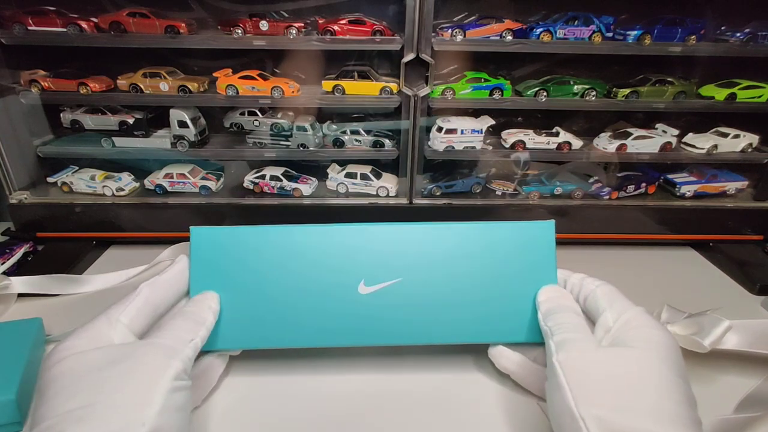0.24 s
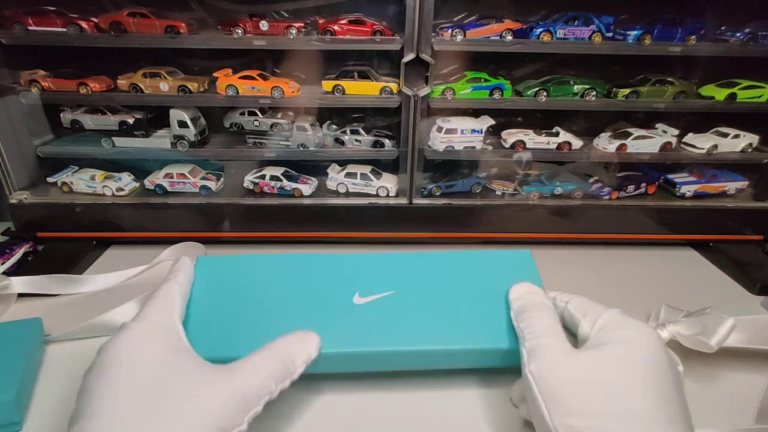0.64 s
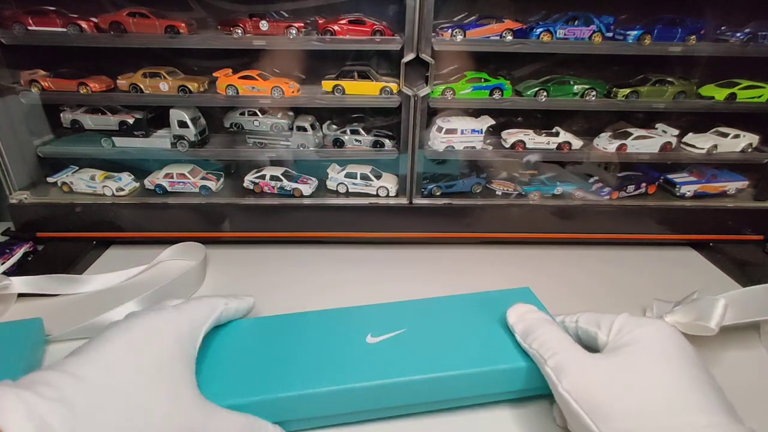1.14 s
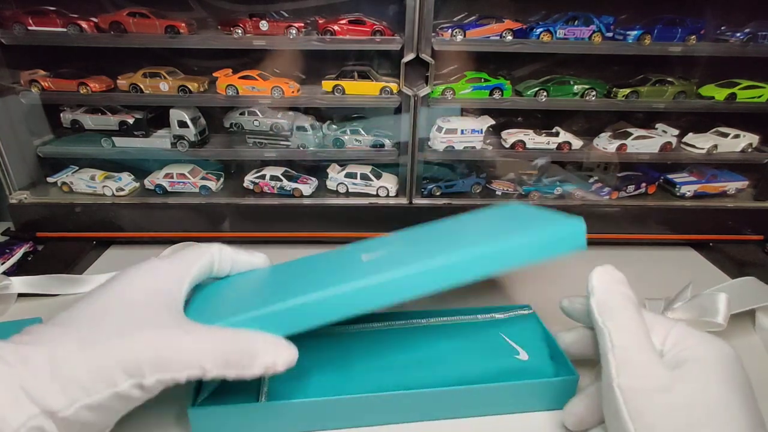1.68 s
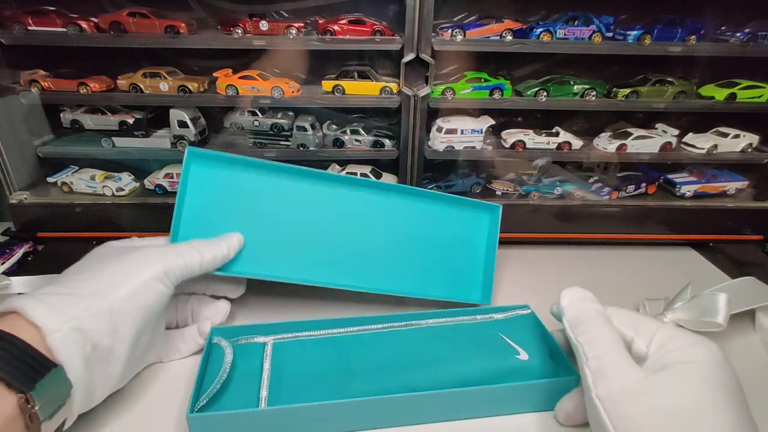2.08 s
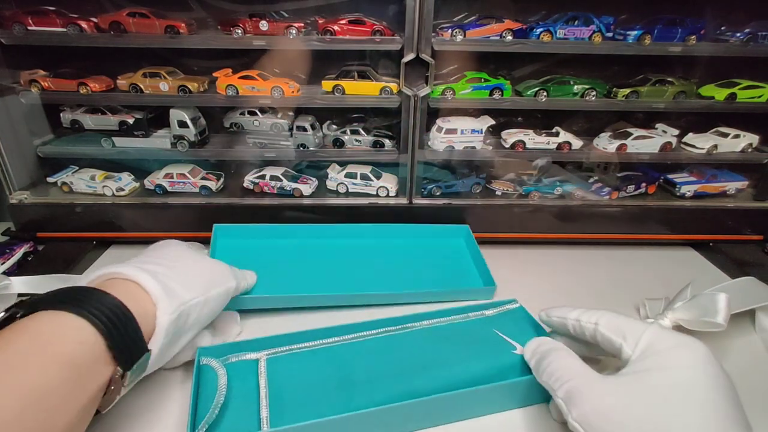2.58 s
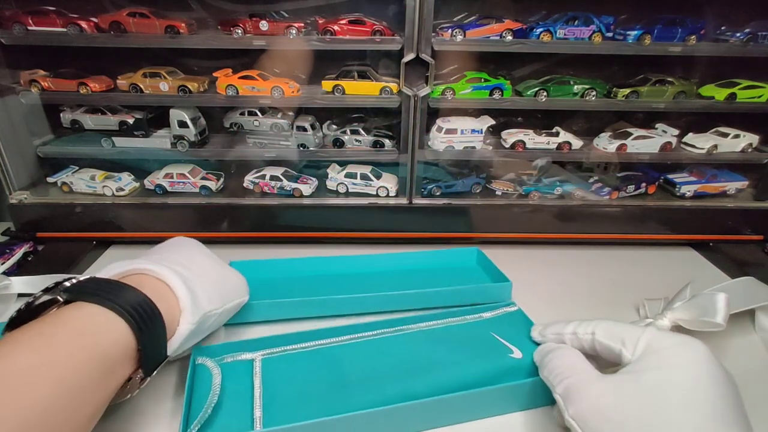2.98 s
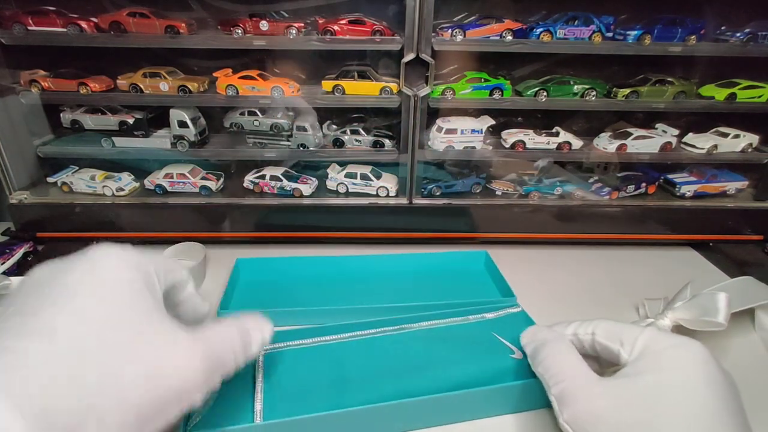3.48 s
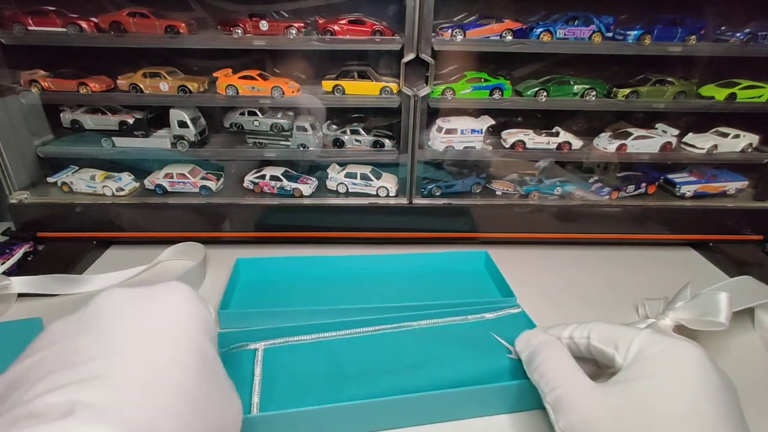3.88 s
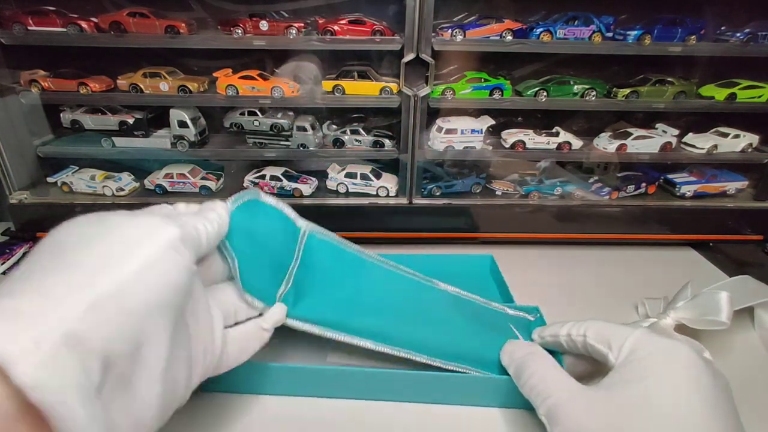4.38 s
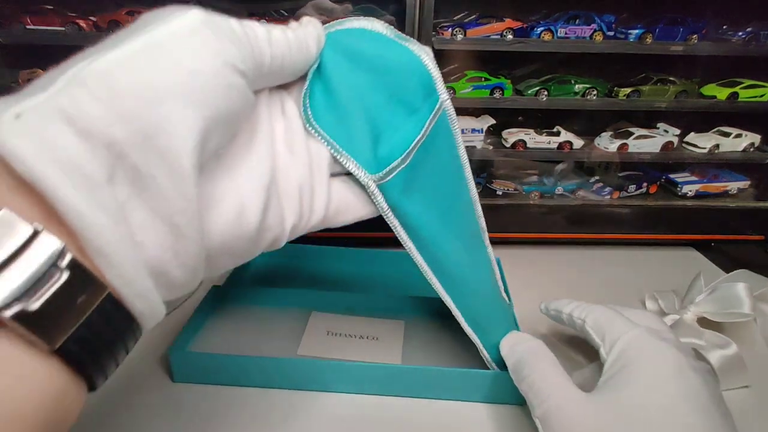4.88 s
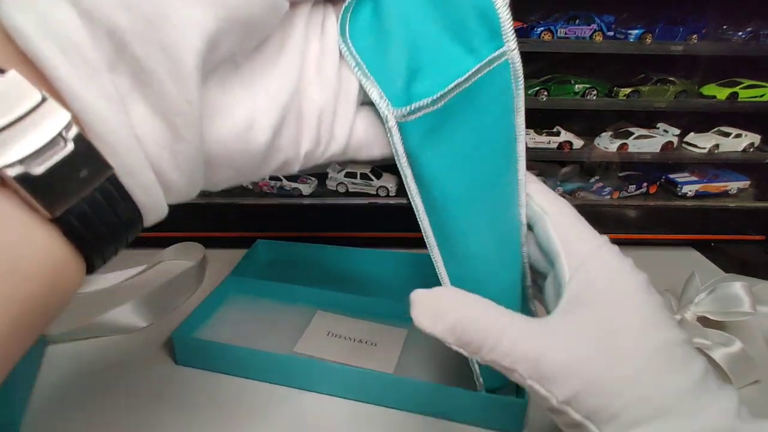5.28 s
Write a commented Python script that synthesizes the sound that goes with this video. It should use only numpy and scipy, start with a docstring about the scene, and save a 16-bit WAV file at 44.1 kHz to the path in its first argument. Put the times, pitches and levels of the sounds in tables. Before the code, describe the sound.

Gloved hands work the lid off a cardboard box with soft scrapes, hollow knocks and a loud double clack, then cloth rustles quietly.

```python
"""A quiet small room rumbles while gloves brush card: hands slide the lid off a cardboard box on a table,
turn it over, set it down and lift out a cloth bag, before two close microphone ports.
Blows ring the box's panels as decaying sines, thump the table and crack as short noise, with a short room tail.
Rubbing is random fibre clicks through resonances; treble ticks, dead pops and humming panels fall in between."""
import sys
import numpy as np
from scipy import signal
from scipy.fft import rfft, irfft
from scipy.io import wavfile
from scipy.ndimage import uniform_filter1d

SR = 44100
rng = np.random.default_rng(int(sys.argv[2]) if len(sys.argv) > 2 else 0)


def unload_audio(sound):
    """Save the sound as a 16-bit wav file, at the path given as the first command line argument."""
    columns = np.transpose(np.atleast_2d(sound))
    # keep every value between -1 and 1, then stretch to whole-number steps
    steps = np.round(np.clip(columns, -1, 1) * 32767)
    wavfile.write(sys.argv[1], SR, steps.astype(np.int16))


def boost_factor(decibels):
    """Convert a level in decibels to a linear amplitude factor."""
    exponent = np.asarray(decibels, float) / 20
    return 10 ** exponent


N = 243917  # samples


def evened(x):
    """Scales to rms 1."""
    return x / np.sqrt(np.mean(x ** 2) + 1e-20)


def early(x):
    """Scales to rms 1 over the first 15 ms."""
    return x / np.sqrt(np.mean(x[..., :660] ** 2))


def read(points, hz):
    """Reads a table along log frequency."""
    f, value = np.transpose(points)
    return np.interp(np.log(hz + 1), np.log(f + 1), value)


def add(mix, s, sound):
    """Mixes a sound in at time s."""
    part = mix[round(s * SR):][:len(sound)]
    part += sound[:len(part)]


def colour(x, points):
    """Filters by a spectrum in dB."""
    hz = np.fft.rfftfreq(x.shape[-1], 1 / SR)
    return irfft(rfft(x) * boost_factor(read(points, hz)), x.shape[-1])


def resonances(x, peaks):
    """Sum of two-pole resonances (Hz, width Hz, dB), neighbours in opposite sign, scaled to rms 1."""
    hz = np.fft.rfftfreq(N, 1 / SR)
    gain = 0
    for k, (f, width, db) in enumerate(peaks):
        band = 1j * hz * width
        gain = gain + (-1) ** k * boost_factor(db) * band / (f ** 2 - hz ** 2 + band)
    return evened(irfft(rfft(x) * gain, N))


def pair(sources, same, lean, lead):
    """Two microphone ports: the right hears a share of a second, unrelated source, later and at its own level."""
    hz = np.fft.rfftfreq(N, 1 / SR)
    likeness = np.clip(read(same, hz), 0, 1)
    tilt = boost_factor(read(lean, hz) / 2)
    first, second = rfft(sources)
    right = likeness * first + np.sqrt(1 - likeness ** 2) * second
    right = right * np.exp(-2j * np.pi * hz * lead / SR)
    return irfft(np.array([first * tilt, right / tilt]), N)


# Where the sounds on the box lie between the ports. Each row: time in seconds, left over right in dB.
BOX_PLACE = [(0, 5), (1.6, 4.5), (2.07, 4), (2.1, -2), (2.2, 2.4), (2.5, 4), (3.5, 6), (5.5, 5)]


def place(mix, s, sound, lead=3.5):
    """Adds a sound to both ports, louder at the nearer one, sooner at the left by lead samples."""
    lean_db = np.interp(s, *np.transpose(BOX_PLACE))
    for side, port in zip((1, -1), mix):
        add(port, s - side * lead / 2 / SR, sound * boost_factor(side * lean_db / 2))


# Spectrum of room rumble and microphone hiss. Each row: frequency in Hz, relative level in dB per Hz.
AIR_SPECTRUM = [(8.8, -31.5), (15, 0.5), (87, -5), (161, -12), (229, -15), (423, -18.5), (620, -18),
                (855, -27), (1020, -18), (1290, -24), (2680, -31), (3290, -29), (6850, -39.5),
                (14700, -30.5), (16500, -51)]
# How alike the ports hear the air. Each row: frequency in Hz, left-right likeness (1 is identical).
AIR_LIKENESS = [(60, 0.7), (180, 1), (550, -1.2), (1650, 1), (4970, 0.71), (15000, 0.082)]
# Balance of the air between the ports. Each row: frequency in Hz, left over right in dB.
AIR_BALANCE = [(60, 1), (180, 2.5), (550, 6.5), (1650, 7.5), (4970, 7.5), (15000, 3.5)]


def air():
    """Room rumble and microphone hiss: steady coloured noise, partly shared by the ports."""
    noise = evened(colour(rng.standard_normal((2, N)), AIR_SPECTRUM))
    return boost_factor(-60) * pair(noise, AIR_LIKENESS, AIR_BALANCE, 0)


# How long the small room rings. Each row: frequency in Hz, t60 in seconds.
ROOM_T60 = [(150, .25), (500, 0.42), (1500, .2), (4000, 0.52), (10000, 0.25)]


def room(x):
    """Room tail: sparse taps of random sign, each band dying at its own speed."""
    taps = np.zeros((2, SR // 2))
    slots = np.arange(200, SR // 2 - 20, 20)
    at = slots + rng.integers(0, 20, (2, len(slots)))
    np.put_along_axis(taps, at, rng.choice([-1., 1.], at.shape), 1)
    hz, t, z = signal.stft(taps, SR, nperseg=256)
    fade = boost_factor(-60 * t / read(ROOM_T60, hz)[:, None])
    tail = signal.istft(z * fade, SR, nperseg=256)[1]
    tail = tail / np.linalg.norm(tail[0])
    return signal.fftconvolve(x.mean(0)[None], tail, axes=1)[:, :N]


def fibres(per_s, uneven_db, smooth):
    """Fibres catch and let go: random clicks of uneven size over smooth noise."""
    hit, size, sign = rng.random((3, 2, N))
    sizes = boost_factor(-uneven_db * np.log(size + 0.0012))
    clicks = (hit < per_s / SR) * sizes * np.sign(sign - .5)
    return evened(clicks) + smooth * rng.standard_normal((2, N))


def streaky(x, patchy_db, frames, bins):
    """Patches of the spectrum swell and fade as the grip shifts."""
    z = signal.stft(x, nperseg=512, noverlap=384)[2]
    field = rng.standard_normal(z.shape[1:])
    field = evened(uniform_filter1d(uniform_filter1d(field, bins, 0), frames, 1))
    return signal.istft(z * boost_factor(patchy_db * field), nperseg=512, noverlap=384)[1][:, :N]


# Strokes of glove or cloth. Each row: peak in seconds, rise in seconds, fall in seconds, hiss in dB,
# fizz over hiss in dB.
RUB_STROKES = [(.088, .09, .1, -65, -8), (.39, 0.22, 0.062, -69, -8), (0.549, 0.01, 0.066, -64, -6),
               (.7, 0.1, 0.11, -53.5, -5), (.842, .1, 0.089, -57, 1.5), (1.0, 0.45, 0.6, -57.5, -8),
               (1.15, 0.014, 0.093, -52.5, -14), (1.3, 0.1, 0.54, -58, -7.5),
               (1.41, 0.032, .04, -56.5, -6.5), (1.468, 0.014, 0.017, -50.5, -19),
               (1.492, 0.005, 0.0085, -40, -18), (1.531, 0.053, 0.11, -44.5, -9.5),
               (1.75, 0.14, 0.28, -64.5, -7.5), (1.945, 0.087, 0.042, -50, -5),
               (2.06, 0.07, 0.027, -44, -8), (2.17, 0.013, 0.097, -47.5, -13.5),
               (2.351, 0.063, 0.06, -53.5, -8.5), (2.55, 0.23, 0.076, -61, -9.5),
               (2.631, 0.043, 0.3, -58.5, -4.5), (2.782, 0.082, 0.045, -45.5, -9.5),
               (2.88, 0.058, 0.066, -52, -10), (3.058, .03, 0.087, -68, -13.5),
               (3.24, .06, .06, -59.5, -14.5), (3.32, 0.021, .03, -70, -5), (3.717, .045, 0.047, -54, -13),
               (3.788, .03, 0.035, -53, -13), (3.909, 0.066, 0.075, -52.5, -11.5),
               (4.046, .05, .02, -60, -6.5), (4.178, 0.057, 0.11, -60.5, -9.5),
               (4.308, .015, .015, -61.5, -8.5), (4.38, 0.091, .03, -69.5, -6),
               (4.462, 0.062, 0.11, -53, -12), (4.737, 0.13, .2, -54, -14.5),
               (4.909, .08, 0.17, -60, -10.5), (5.18, 0.065, 0.24, -60.5, -10.5),
               (5.39, 0.052, 0.12, -56.5, -13)]
# How far the box drones along with a stroke. Each row: time in seconds, drone over hiss in dB.
BOX_CONTACT = [(0, 1.5), (.45, 0), (.62, -1), (1.0, -1), (1.4, 4.5), (1.62, -4), (1.8, -8.5), (1.95, -12.5),
               (2.1, -7), (2.58, 9.5), (2.7, 1.5), (2.9, -4), (3.06, -3.5), (3.25, 4), (3.7, -9),
               (4.3, -0.5), (4.75, -8.5), (5.15, -4.5), (5.3, -1.5), (5.53, -5.5)]


def rub_levels():
    """Gains of hiss, drone and fizz: strokes swell, fade and add in power; blows leave the panels droning."""
    edge_db, roundness = -11, 1.5  # level one rise or fall away from the peak; shape of the peak
    linger_db, linger_db_per_s, linger_rise_s = -18.5, 154.5, 0.005  # start against low panels, decay, onset
    t = np.arange(0, N + 64, 64) / SR
    s, rise, fall, hiss_db, fizz_db = np.transpose(RUB_STROKES)[:, :, None]
    away = np.where(t < s, (s - t) / rise, (t - s) / fall)
    swell = boost_factor(hiss_db + edge_db * away ** roundness) ** 2

    hit, low_db = np.transpose(BLOWS)[[0, 2], :, None]
    after = np.maximum(t - hit, 0)
    linger = boost_factor(low_db + linger_db - linger_db_per_s * after) * (1 - np.exp(-after / linger_rise_s))

    hiss = swell.sum(0)
    drone = hiss * boost_factor(np.interp(t, *np.transpose(BOX_CONTACT))) ** 2 + (linger ** 2).sum(0)
    fizz = (swell * boost_factor(fizz_db) ** 2).sum(0)
    return [np.interp(np.arange(N) / SR, t, np.sqrt(power)) for power in (hiss, drone, fizz)]


# Resonances of rubbed card and of the microphone ports. Each row: frequency in Hz, width in Hz, level in dB.
HISS_PEAKS = [(2000, 150, -1), (2500, 580, -5), (2850, 230, -1.5), (3190, 260, -1.5), (3700, 430, 2.5),
              (4300, 770, 2), (4810, 780, -1.5)]
# How strongly rubbing drives the panels and table. Each row: frequency in Hz, drive in dB.
DRONE_DRIVE = [(130, -6.5), (190, -5.5), (300, 0.5), (420, -1), (640, -2), (860, -3), (1100, 1),
               (1500, -3.5), (2100, -11)]
# Spectrum of the bright fizz. Each row: frequency in Hz, relative level in dB per Hz.
FIZZ_SPECTRUM = [(2940, -27), (5000, -18.5), (5690, -4.5), (8000, -4.5), (11700, -12.5), (15200, -4.5),
                 (16300, -20), (16500, -49)]
# How alike the ports hear the hands. Each row: frequency in Hz, left-right likeness.
HAND_LIKENESS = [(60, 1), (180, 1), (550, 0.93), (1650, 0.63), (4970, 0.34), (15000, -0.03)]
# Balance of the hands between the ports. Each row: frequency in Hz, left over right in dB.
HAND_BALANCE = [(60, 3.5), (130, 5), (290, 1), (640, 4), (1410, 4.5), (3100, 16), (6820, -1.5), (15000, -1)]


def rubbing():
    """Gloves and cloth slide on card: hiss, the panels droning along, and bright fizz."""
    ring_factor = 1.3  # panels ring longer under a light, sliding hand
    hand_lead = 6.4  # samples by which the left port hears the hands first
    grip = evened(uniform_filter1d(uniform_filter1d(rng.standard_normal(N), 300), 300))  # pressure wavers
    modes = [(hz, 2.2 / (t60 * ring_factor), db + read(DRONE_DRIVE, hz))
             for hz, db, t60, *swing in TABLE_MODES + BOX_PANELS]
    hiss = streaky(resonances(fibres(2000, 3.2, 1.6), HISS_PEAKS), 2.8, frames=12, bins=3)
    drone = streaky(resonances(fibres(970, 1.3, 0.4), modes), 1.3, frames=24, bins=2)
    fizz = colour(fibres(4100, 2.0, 2.0), FIZZ_SPECTRUM)
    out = np.zeros((2, N))
    for layer, level in zip((hiss, drone, fizz), rub_levels()):
        ports = pair(layer, HAND_LIKENESS, HAND_BALANCE, hand_lead)
        out += ports / np.std(ports.mean(0)) * level * boost_factor(.9 * grip)
    return out


# Slips of a finger. Each row: start in seconds, length in seconds, frequency in Hz, width in Hz,
# level in dB before the fades.
FINGER_SQUEAKS = [(1.46, 0.022, 1550, 120, -53.5), (1.599, 0.029, 2620, 100, -58),
                  (1.87, 0.21, 2000, 119, -73.5), (2.765, 0.079, 3700, 149, -50.5),
                  (3.036, 0.0794, 3700, 251, -64), (5.363, 0.14, 810, 73.5, -70.5)]


def squeaks():
    """A slipping finger holds one narrow resonance for a moment: narrow noise, faded in and out."""
    out = np.zeros((2, N))
    for s, length, hz, width, db in FINGER_SQUEAKS:
        noise = resonances(rng.standard_normal(N), [(hz, width, 0)])[:round(length * SR)]
        place(out, s, boost_factor(db) * evened(noise) * signal.windows.tukey(len(noise), .5))
    return out


# Dry bright ticks. Each row: time in seconds (heard 1.4 ms later), peak in dB, left over right in dB.
EDGE_TICKS = [(1.1183, -38, 16), (1.1268, -33.5, -8), (2.1046, -25.5, -3.5), (2.1306, -16.5, -7),
              (2.2248, -33.5, -2), (3.3006, -27.5, -3), (3.91, -47.5, -3), (4.3865, -42.5, -5),
              (5.1202, -56.5, 10)]
# Spectrum of a tick. Each row: frequency in Hz, relative level in dB per Hz.
TICK_SPECTRUM = [(2650, -30.5), (4500, -7.5), (5720, -11.5), (7030, -11.5), (7830, -13), (12900, -20),
                 (15000, -20), (16500, -28.5)]


def ticks():
    """Short puffs of treble noise where a hard edge touches."""
    out, t = np.zeros((2, N)), np.arange(2048) / SR
    for s, peak_db, lean_db in EDGE_TICKS:
        noise = rng.standard_normal((2, len(t)))
        puff = colour(noise, TICK_SPECTRUM) * boost_factor(-60 * t / 0.011)  # t60 in s
        for side, port in enumerate(out):
            level = boost_factor(peak_db + lean_db * (.5 - side))
            add(port, s + 0.0014, puff[side] / abs(puff).max() * level)
    return out


# One free panel ringing on. Each row: start in seconds, level in dB, frequency in Hz, t60 in seconds,
# length in seconds.
FREE_PANELS = [(2.058, -31, 643, 0.13, 0.072), (2.656, -29, 308.4, 0.13, .06),
               (4.415, -37, 457, 0.048, 0.041), (5.243, -43.5, 305, 0.37, 0.11),
               (5.244, -37, 336, 0.07, 0.092), (5.255, -47.5, 447, 0.13, 0.11)]


def humming_panels(t):
    """One free panel rings on alone, its level wavering, until a hand stops it."""
    out = np.zeros((2, N))
    for s, db, hz, t60, length in FREE_PANELS:
        hum = np.sin(2 * np.pi * hz * t) * boost_factor(db - 60 * t / t60) * (1 - np.exp(-t / 0.0011))
        waver = boost_factor(2.0 * evened(uniform_filter1d(rng.standard_normal(len(t)), 300)))
        stop = np.clip((length - t) / 0.0065, 0, 1)
        place(out, s, hum * waver * stop)
    return out


# Pops of the closed box. Each row: start in seconds, peak in dB, frequency in Hz, t60 of the decay in seconds.
BOX_POPS = [(0.6561, -24.5, 756, 0.0021), (0.7015, -30, 530, 0.0034), (1.0674, -27, 810, 0.0025),
            (1.5043, -11, 1240, 0.0044), (1.5875, -22.5, 650, 0.0048), (1.1296, -19, 722, 0.0065),
            (4.3883, -35, 764, 0.0092)]


def pops(t):
    """The closed box answers a finger or the lid's release with one dead swing: a heavily damped cosine."""
    out = np.zeros((2, N))
    for s, peak_db, hz, t60 in BOX_POPS:
        onset = (1 - np.exp(-t * hz / 0.51)) ** 2
        pop = -np.cos(2 * np.pi * hz * t) * boost_factor(-60 * t / t60) * onset
        place(out, s, boost_factor(peak_db) * pop / abs(pop).max())
    return out


# Modes of the table top. Each row: frequency in Hz, level in dB, t60 in seconds.
TABLE_MODES = [(133, -1, 0.085), (178, -3, .05)]


def table_thud(t):
    """The table top's low modes die away together after a soft onset."""
    thud = sum(np.sin(2 * np.pi * hz * t) * boost_factor(db - 60 * t / t60) for hz, db, t60 in TABLE_MODES)
    return early(thud * (1 - np.exp(-t / .003)))


# Landings of the box. Each row: start in seconds, early rms in dB.
BOX_THUMPS = [(1.586, -45), (2.646, -45), (3.297, -49.5), (3.657, -57.5), (3.909, -48.5)]


def thumps(t):
    """The box's weight lands on the table and rings its modes."""
    out, thud = np.zeros((2, N)), table_thud(t)
    for s, db in BOX_THUMPS:
        place(out, s, boost_factor(db) * thud)
    return out


# Panels and air of the box; close neighbours that start in opposite directions swell and beat.
# Each row: frequency in Hz, level in dB, t60 in seconds before the glove's damping, sign of the first swing.
BOX_PANELS = [(277, -6, 0.016, 1), (347, -12.5, 0.047, 1), (355, -11.5, .05, 1), (424.6, 0, 0.079, -1),
              (491.8, -6, 0.19, 1), (550, -13, .05, -1), (657, -1.5, 0.042, 1), (762, -2.5, .05, 1),
              (859.7, 4.5, .06, -1), (904.4, -2, 0.058, -1), (1055, -6, 0.052, 1), (1270, -2.5, 0.041, -1),
              (1377, -5, 0.017, 1), (1522, 0.5, 0.038, -1), (1683, -3.5, .045, 1), (1845, -8, 0.066, -1),
              (2370, -4.5, 0.065, 1)]


def panel_groups(t):
    """Panels ring as decaying sines: low below 600 Hz, lid up to 1200 Hz, rim above."""
    held_s, held_db = .0093, -10  # the glove settles on the card after a blow and damps it
    hz, db, t60, swing = np.transpose(BOX_PANELS)[:, :, None]
    rings = np.sign(swing) * boost_factor(db - 60 * t / t60) * np.sin(2 * np.pi * hz * t)
    rings *= 1 - np.exp(-t / 0.00035)  # card is soft
    rings *= boost_factor(held_db * (1 - np.exp(-(t / held_s) ** 8)))
    group = np.searchsorted([600, 1200], hz[:, 0])
    low, lid, rim = (rings[group == g].sum(0) for g in range(3))
    return early(low), lid / abs(lid).max(), early(rim)


# Blows on the card. Each row: start in seconds, lid panels' peak in dB, then early rms in dB of the low panels,
# the rim and the crack.
BLOWS = [(0.657, -37.5, -56, -48, -59), (0.702, -59, -53, -61, -57), (1.068, -41, -45.5, -48.5, -60),
         (1.129, -15, -29.5, -29, -38.5), (1.417, -39, -66, -52, -55), (1.505, -22.5, -34.5, -37, -40),
         (1.532, -31.5, -59, -65, -60), (1.585, -38.5, -41.5, -67, -50), (2.058, -37.5, -38, -51, -52),
         (2.1039, -1.5, -15, -42, -37), (2.131, -32, -26.5, -27.5, -21), (2.2249, -5.5, -18, -30.5, -30.5),
         (2.433, -27, -36.5, -46, -49.5), (2.4452, -19, -34, -31, -49), (2.6484, -25.5, -41.5, -39.5, -49),
         (2.659, -41, -39, -43.5, -53), (2.771, -40, -44, -42, -62), (2.919, -31, -51, -51, -68),
         (3.259, -49, -59, -57, -67), (3.299, -41.5, -64, -55, -48), (3.659, -58.5, -68.5, -62.5, -60),
         (3.909, -45.5, -51.5, -48, -46), (4.385, -35.5, -49, -53, -51), (4.413, -42.5, -53, -56, -54),
         (4.5401, -42.5, -60.5, -48.5, -45), (4.572, -53.5, -67, -66.5, -52.5),
         (4.832, -51, -61.5, -60, -59.5), (5.122, -46.5, -55.5, -55, -50), (5.241, -51, -63, -61.5, -61.5)]
# The loose card rebounds after every blow. Each row: delay in seconds, level in dB, both before scatter.
REBOUNDS = [(0.0153, -16), (.028, -26), (.045, -26)]
# Spectrum of the crack. Each row: frequency in Hz, relative level in dB per Hz.
CRACK_SPECTRUM = [(1060, -33), (1800, -11), (2520, -5.5), (2810, -0.5), (3210, -7.5), (3600, -3.5),
                  (4070, -4), (5690, -22.5), (7060, -23.5), (9000, -34), (11700, -61), (19800, -120)]
# How alike the ports hear the cracks. Each row: frequency in Hz, left-right likeness.
CRACK_LIKENESS = [(2000, .65), (8000, .4)]
# Balance of the cracks between the ports. Each row: frequency in Hz, left over right in dB.
CRACK_BALANCE = [(1500, 2), (3000, 5), (5000, 7), (9000, 2)]


def knocks(t):
    """Each blow rings three groups of panels, thumps the table, rebounds and cracks as short noise."""
    thud_db = -13  # the table under a blow, against the low panels
    rim_lead, crack_lead = 8.6, 3  # samples by which the left port is first; the rim sounds from the side
    scatter_size = [.003, 3]  # s, dB; no two blows rebound alike
    out, cracks = np.zeros((2, N)), np.zeros((2, N))
    low, lid, rim = panel_groups(t)
    thud = table_thud(t)
    crack_shape = boost_factor(-60 * t / 0.031) * (1 - np.exp(-t / 0.000096))  # t60 and onset in s
    for s, lid_db, low_db, rim_db, crack_db in BLOWS:
        blow = boost_factor(lid_db) * lid + boost_factor(low_db) * (low + boost_factor(thud_db) * thud)
        scatter = rng.uniform(-1.3, 1, (len(REBOUNDS), 2)) * scatter_size
        for delay, bounce_db in [(0, 0), *(REBOUNDS + scatter)]:
            place(out, s + delay, boost_factor(bounce_db) * blow)
            place(out, s + delay, boost_factor(bounce_db + rim_db) * rim, rim_lead)
        noise = rng.standard_normal((2, len(t)))
        crack = early(colour(noise, CRACK_SPECTRUM) * crack_shape)
        for port, part in zip(cracks, crack):
            add(port, s, boost_factor(crack_db) * part)
    return out + pair(cracks, CRACK_LIKENESS, CRACK_BALANCE, crack_lead)


def scene():
    """All sources at the two ports; only the struck sounds feed the room tail."""
    t = np.arange(8192) / SR
    struck = ticks() + humming_panels(t) + pops(t) + thumps(t) + knocks(t)
    # the struck sounds keep little below about 95 Hz
    port_filter = signal.butter(4, 95, btype="high", fs=SR, output="sos")
    blows = signal.sosfilt(port_filter, struck)
    return air() + boost_factor(-16) * room(blows) + rubbing() + squeaks() + blows


def roll_off(x):
    """The treble ends steeply here."""
    return signal.sosfilt(signal.butter(12, 17010, fs=SR, output="sos"), x)


def record(dry):
    """The input stage rounds off the loudest swings under a soft ceiling."""
    ceiling = .97  # of full scale
    rounded = dry / (1 + abs(dry / ceiling) ** 6) ** (1 / 6)
    return roll_off(rounded)


dry = scene()
out = record(dry)
unload_audio(out)
```